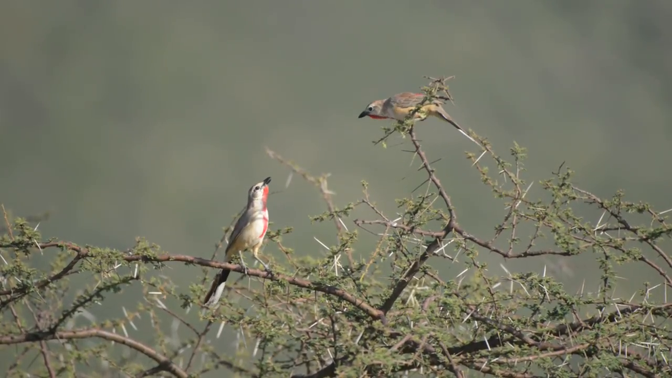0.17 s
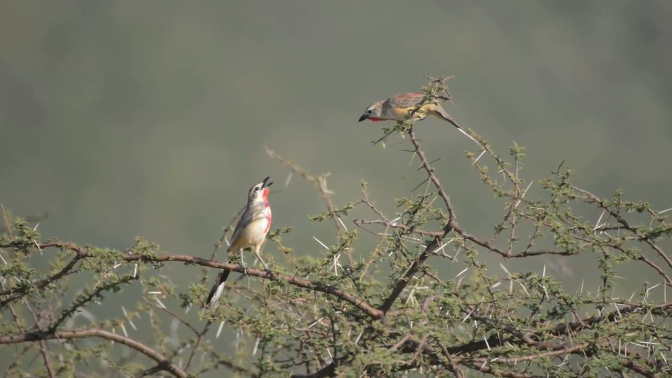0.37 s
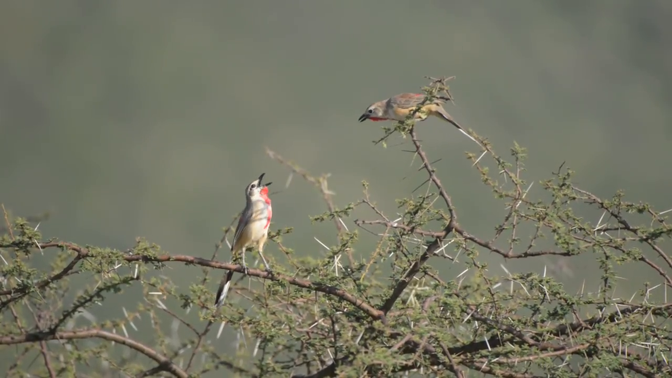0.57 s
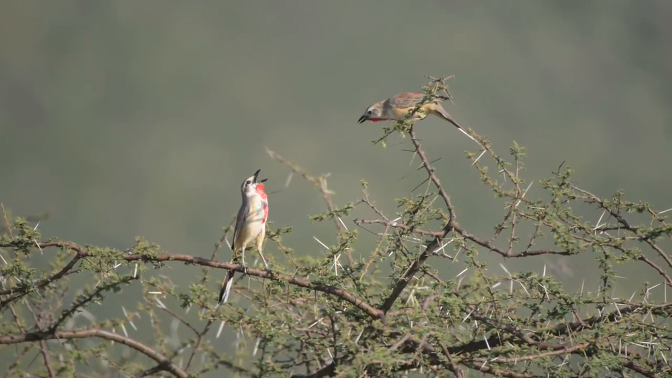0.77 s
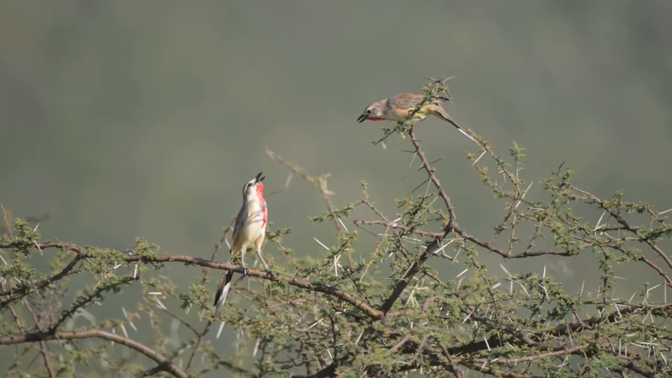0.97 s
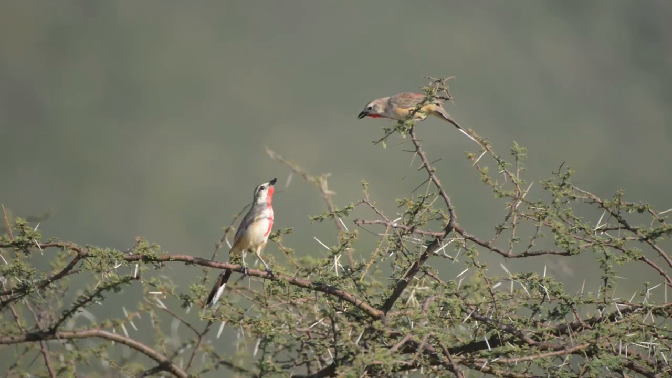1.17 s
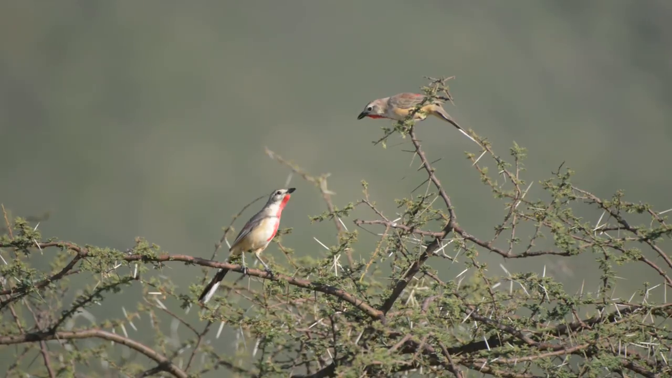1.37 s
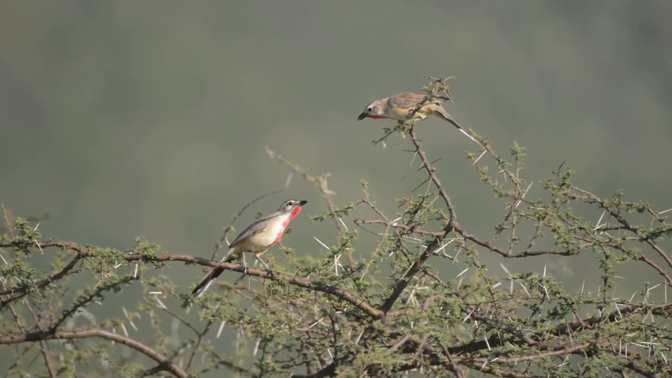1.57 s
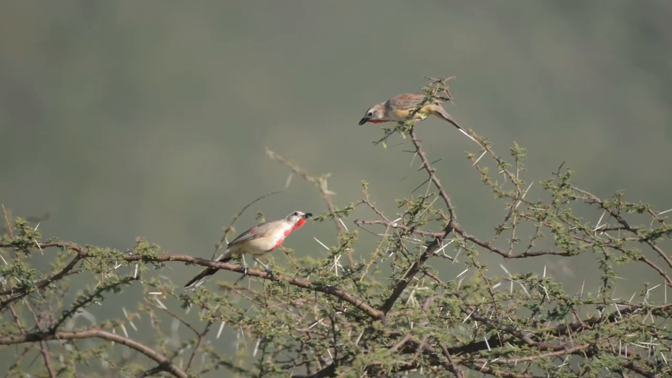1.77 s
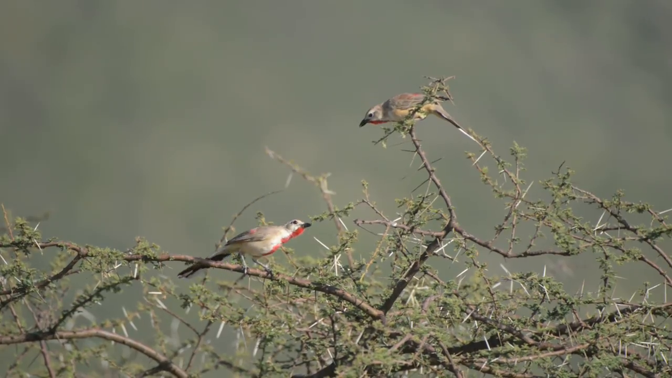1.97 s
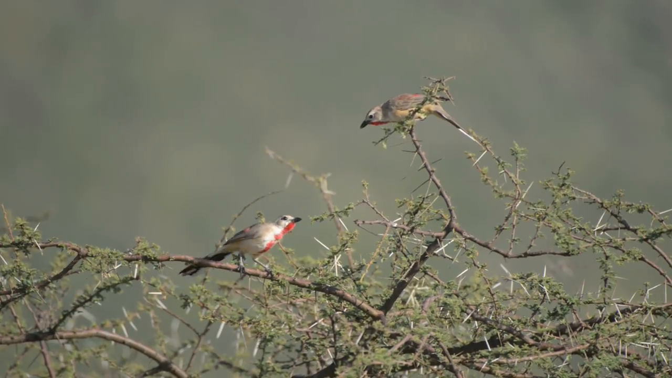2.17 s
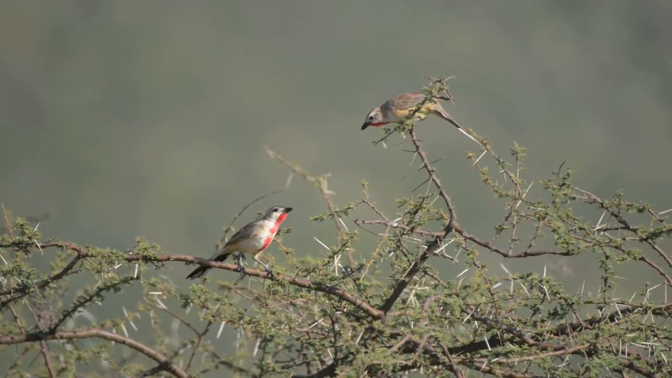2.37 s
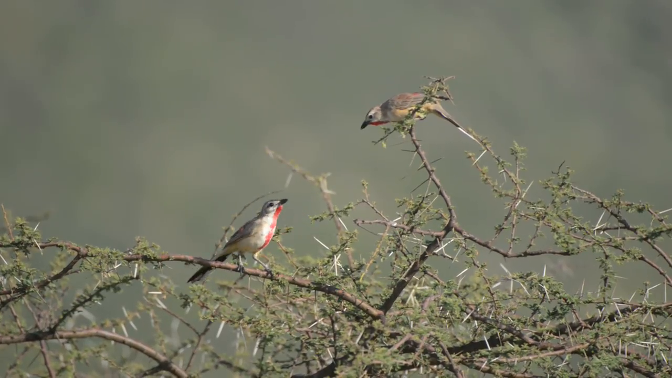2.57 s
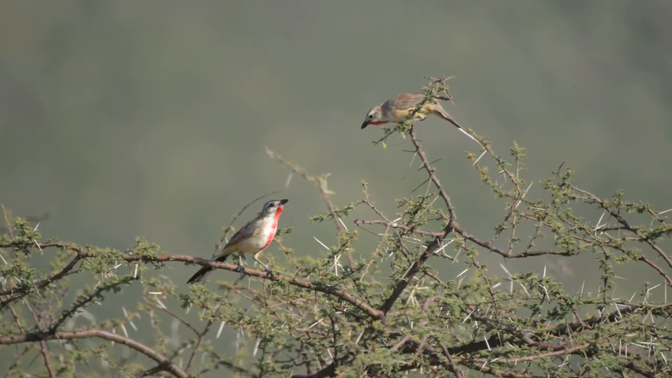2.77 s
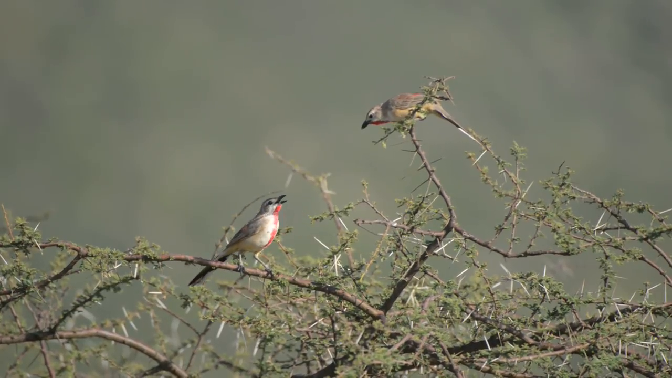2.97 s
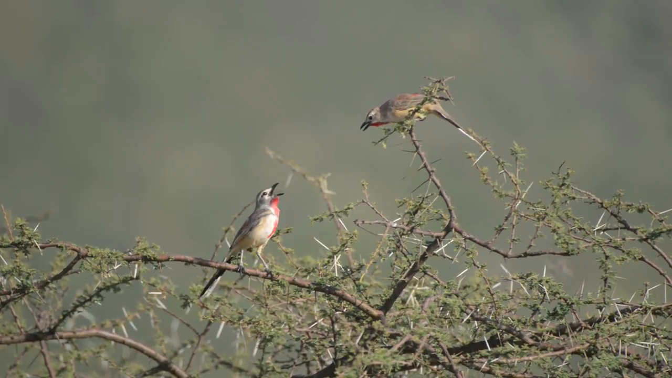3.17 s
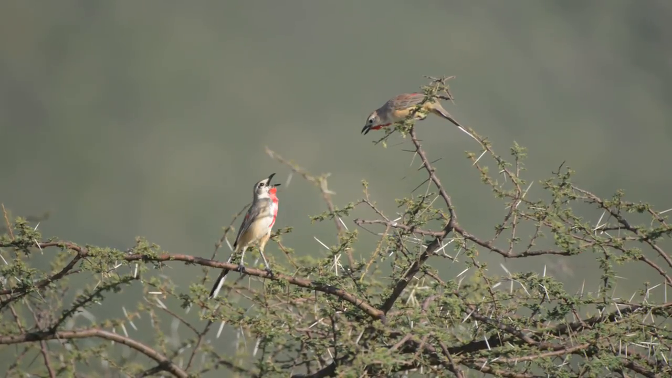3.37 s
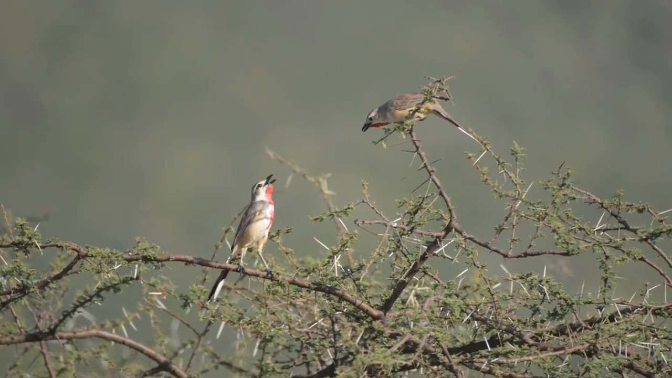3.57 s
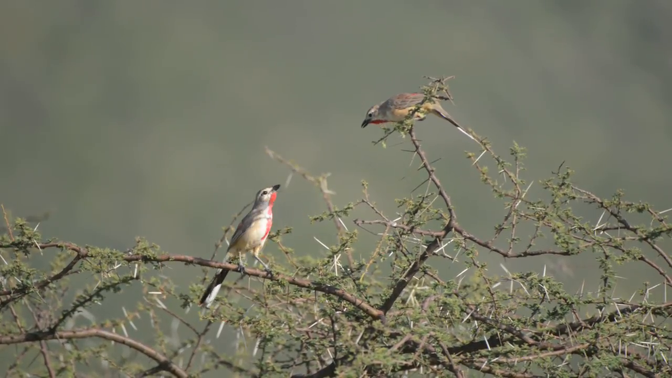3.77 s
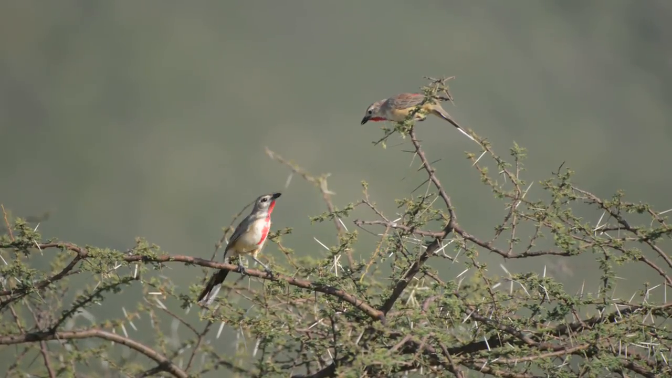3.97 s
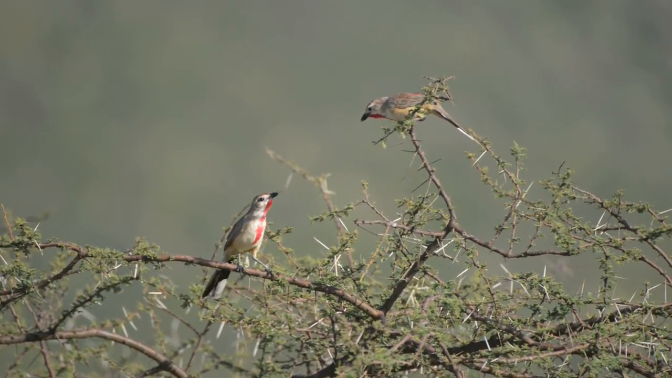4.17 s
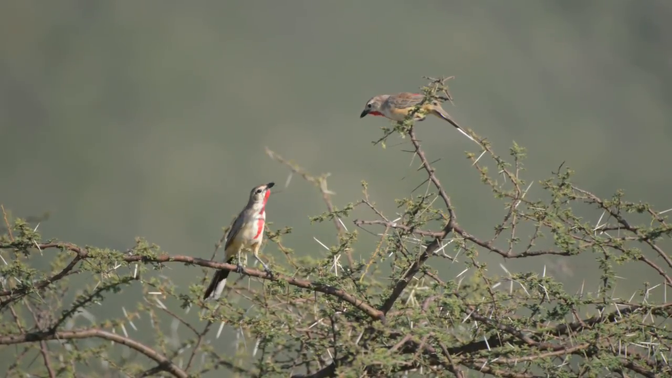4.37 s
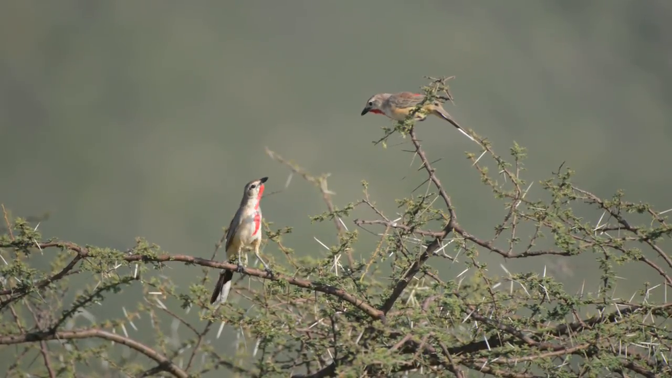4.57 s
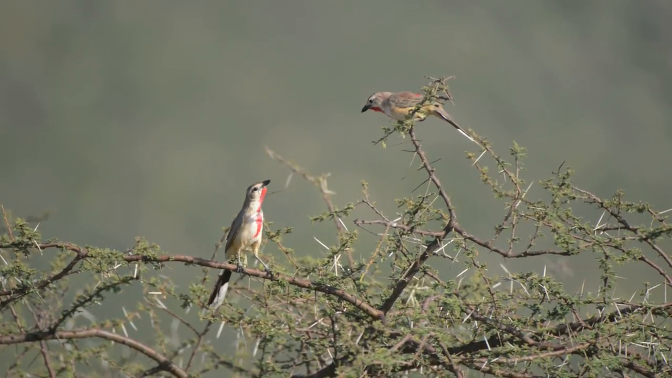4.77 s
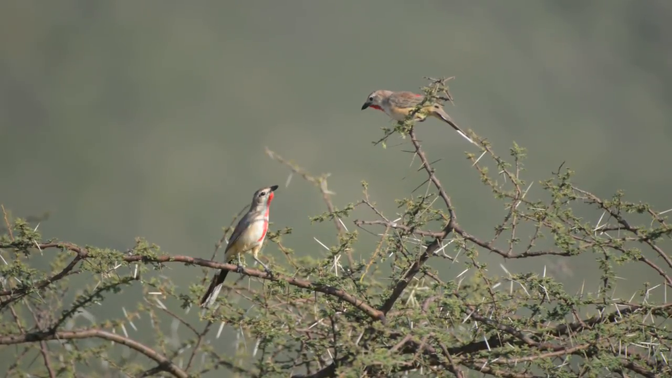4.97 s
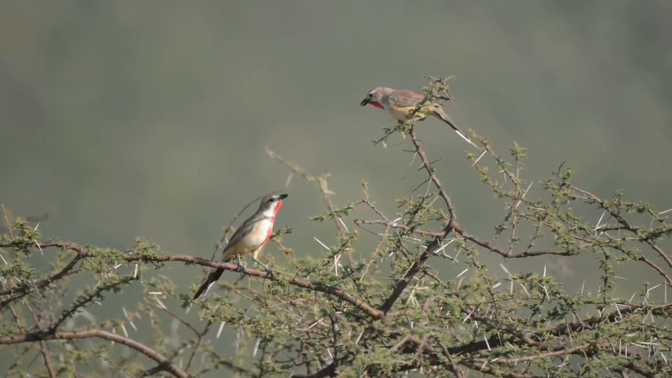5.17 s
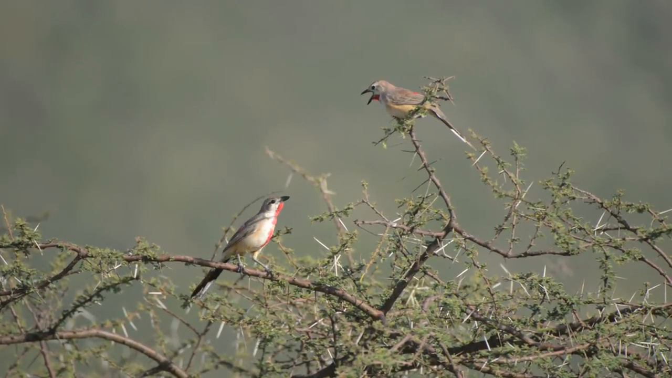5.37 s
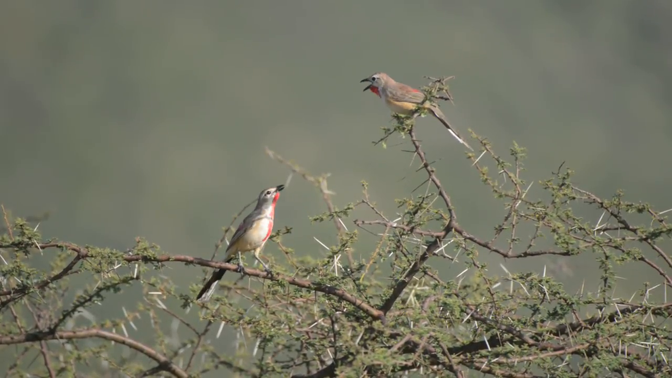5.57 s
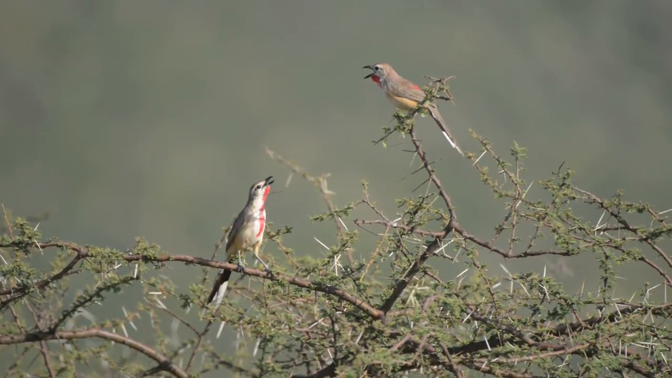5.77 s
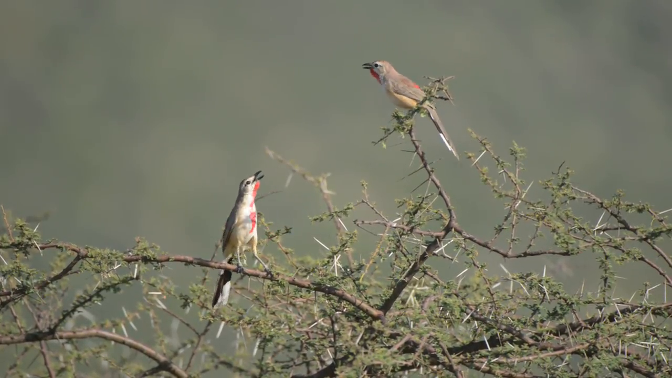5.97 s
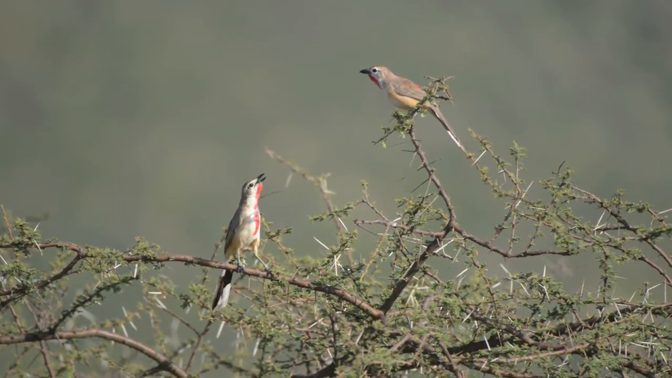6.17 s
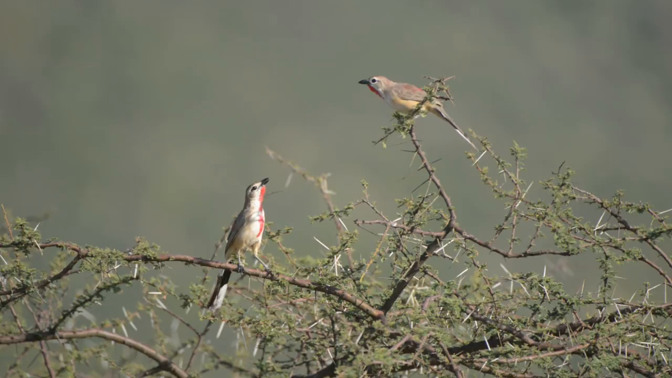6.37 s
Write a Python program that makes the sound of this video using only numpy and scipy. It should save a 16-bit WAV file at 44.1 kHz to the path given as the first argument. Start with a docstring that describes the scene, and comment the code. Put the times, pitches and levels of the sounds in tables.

```python
"""A pair of bush-shrikes whistle from a thorn bush: gliding sines with faint overtones, trills, scrub echo.
Dawn chorus behind: twitterer, assorted short sweeps and a low three-note whistler (pitch-swept sines), throaty
chatter (stacked partials with rasp), doves (falling sine coos, narrow-band murmur), sharp ticks, dry rustles.
Background: distant birds as random chirps blurred into noise haze, and the coloured hiss of air and microphone."""
import sys
import numpy as np
from scipy import signal
from scipy.fft import rfft, irfft
from scipy.io import wavfile
from scipy.ndimage import uniform_filter1d

SR = 44100
rng = np.random.default_rng(int(sys.argv[2]) if len(sys.argv) > 2 else 0)


def log_audio(samples):
    """Write samples as a 16-bit WAV file to the path given in sys.argv[1]."""
    # one column per channel
    frames = np.atleast_2d(samples).T
    # limit to full scale, then quantise
    limited = np.clip(frames, -1, 1)
    pcm = np.round(limited * 32767).astype(np.int16)
    wavfile.write(sys.argv[1], SR, pcm)


N = 283122
TIME = np.arange(N) / SR

# air and microphone hiss, relative spectrum density: f/Hz, level/dB
AIR_SPECTRUM = [(8, -5.5), (25, -5), (45, -4), (82, 1), (164, -0.5), (666, -4.5), (1080, -8), (3000, -9.5),
                (6000, -12), (8800, -19), (15500, -24)]
# distant birds: t/s, level of low voices/dB, level of high voices/dB
FAR_LEVELS = [(0, -46.5, -45.5), (.19, -47, -56), (.32, -51.5, -64), (.43, -47.5, -52.5), (.523, -66, -60),
              (.61, -46, -45), (.73, -47, -51), (.94, -48, -55.5), (1.2, -51, -51.5), (1.35, -54.5, -45),
              (1.44, -52, -54), (1.53, -47, -53.5), (1.73, -51, -54.5), (1.97, -48, -50), (2.15, -57, -55),
              (2.3, -52, -54), (2.66, -46.5, -51.5), (2.85, -50, -50), (3.04, -48.5, -56),
              (3.33, -51.5, -50), (3.49, -60.5, -53), (3.68, -44.5, -52), (3.85, -49, -48),
              (4.06, -48, -50.5), (4.5, -49, -55.5), (4.588, -54, -55), (4.68, -44, -51), (4.88, -55, -55),
              (5.01, -43.5, -51), (5.11, -62, -50.5), (5.37, -48, -48.5), (5.55, -53, -51),
              (5.76, -47.5, -48), (5.97, -49, -55), (6.2, -50, -53), (6.42, -54, -48)]
# weighting of the distant crowd before levelling: f/Hz, gain/dB
FAR_SPECTRUM = [(1100, -11), (1700, -7.5), (2300, -3), (3500, -4.5), (4500, -0.5), (6000, -5.5),
                (7300, -7.5), (8800, -16.5)]
# dove coo starts: t/s
COO_STARTS = [-.2, .76, 1.72, 2.66, 3.65, 4.63, 5.65]
# one coo: t after start/s, f/Hz, level/dB
COO_CONTOUR = [(0, 994, -56), (.03, 991, -64), (0.079, 954, -57.5), (0.129, 863, -60.5), (.17, 790, -65),
               (.2, 763.5, -82), (.9, 760, -86.5)]
# second dove: start/s, length/s, f at start/Hz, middle/Hz, end/Hz, level/dB
DOVE_HOOTS = [(3.0, 0.24, 563, 565, 570, -62.5), (3.54, 0.224, 569, 558, 569, -64)]
# low cooing after each coo: t after start/s, level/dB
COO_MURMUR = [(0, -67.5), (.13, -67.5), (.2, -62.5), (.33, -64), (.45, -59.5), (.58, -59.5), (.64, -70),
              (1.0, -66)]
# low whistler, one table per note (rise, arch, fall): t/s, level/dB
LOW_TIMES = [
    [(.775, -47), (1.605, -48), (2.53, -51), (3.38, -50), (4.222, -51), (5.117, -52), (6.032, -51)],
    [(.048, -50), (.915, -51), (1.706, -50), (2.675, -52), (3.53, -52), (4.382, -52), (5.278, -53),
     (6.178, -54)],
    [(.12, -51), (1.01, -51), (1.835, -49), (2.75, -51), (3.62, -53), (4.46, -52), (5.345, -53),
     (6.265, -54)],
]
# its note shapes: length/s, f at start/Hz, turn/Hz, end/Hz
LOW_SHAPES = [(.11, 1350, 1860, 1600), (.11, 1230, 1620, 1300), (.08, 2150, 2030, 1780)]
# faint rising pips: t/s, level/dB
PIP_TIMES = [(3.481, -52), (3.869, -54), (4.141, -53), (4.47, -53.5), (4.93, -54.5)]
# their shape: length/s, f at start/Hz, turn/Hz, end/Hz
PIP_SHAPE = (.029, 1100, 1190, 1300)
# chatter notes: t/s, peak level of strongest partial/dB, f of strongest partial/Hz
CHATTER_NOTES = [(.121, -47, 2200), (.326, -46, 1965), (.668, -46, 2020), (.8145, -42, 2370),
                 (1.007, -44, 2230), (1.169, -44.5, 2050), (1.2785, -44, 2060), (1.306, -38.5, 2057),
                 (1.344, -36, 2006), (1.36, -37.5, 2010), (1.592, -43, 2333), (1.659, -41.5, 1846),
                 (1.828, -43, 2210), (1.93, -35.5, 2055), (1.95, -39.5, 2014), (1.997, -36.5, 1973),
                 (2.511, -42, 2280), (2.596, -48, 1825), (2.646, -43, 1996), (2.752, -44, 2140),
                 (3.286, -49, 2420), (3.606, -44, 2220), (3.7705, -43, 1953), (3.7965, -41, 1940),
                 (4.05, -45, 2210), (4.349, -44.5, 2280), (4.647, -54, 2000), (4.665, -44, 1930),
                 (4.7, -38.5, 1966), (4.965, -40.5, 2330), (4.988, -43, 2377), (5.008, -40, 2357),
                 (5.025, -41, 1910), (5.681, -53, 2400), (5.713, -36.5, 1973), (5.735, -40, 2010),
                 (5.748, -43, 1870), (5.759, -41, 2370), (5.78, -43, 2410), (5.798, -40.5, 2016),
                 (6.104, -49, 1785)]
# assorted whistles and sweeps, with upper partials of chatter and one steep tick:
# start/s, length/s, f at start/Hz, middle/Hz, end/Hz, level/dB
ASSORTED_SWEEPS = [(.034, 0.027, 4250, 3960, 4270, -47), (.166, .05, 6000, 5850, 4740, -55),
                   (.146, 0.039, 5200, 5240, 5540, -49), (.365, 0.071, 2136, 2480, 3660, -50),
                   (.4, 0.03, 1320, 1896, 1350, -49.5), (.423, .054, 2720, 1970, 1230, -54.5),
                   (.425, .055, 5300, 3860, 2270, -48), (.45, 0.033, 6000, 4800, 3300, -67),
                   (.564, .017, 6350, 6360, 6860, -49), (.618, .056, 4060, 4130, 3800, -42),
                   (.998, 0.029, 6840, 6650, 6260, -48.5), (1.0, .042, 6700, 8420, 7170, -56),
                   (1.03, .05, 6390, 7100, 6590, -53), (1.205, .029, 2040, 1960, 1620, -50),
                   (1.206, 0.041, 6480, 6570, 5780, -41.5), (1.25, .047, 1280, 2050, 1250, -53),
                   (1.269, .026, 4280, 4160, 4060, -47), (1.336, 0.054, 4430, 4074, 4080, -46),
                   (1.36, 0.055, 5800, 4700, 4250, -51), (1.455, 0.027, 1340, 1780, 1410, -50.5),
                   (1.753, 0.063, 3930, 4230, 4340, -52), (2.05, 0.032, 1734, 1950, 1314, -48.5),
                   (2.001, 0.017, 7250, 7310, 7580, -43.5), (2.188, 0.027, 7700, 7800, 7900, -47.5),
                   (2.352, 0.019, 7220, 5720, 5440, -44.5), (2.07, .05, 5900, 6160, 5300, -63),
                   (2.198, 0.055, 5220, 5190, 5000, -55), (2.396, .04, 3820, 3554, 3620, -52),
                   (2.487, .025, 5720, 5180, 4840, -55), (2.625, 0.027, 6300, 5300, 6040, -39.5),
                   (2.697, 0.05, 4400, 4520, 4080, -41), (2.728, .033, 4360, 5220, 4100, -37),
                   (2.778, .041, 4220, 4180, 3800, -39.5), (2.83, .35, 4395, 4505, 4470, -53.5),
                   (3.743, 0.079, 1683, 1500, 1555, -51.5), (3.709, 0.03, 4480, 4284, 4070, -50),
                   (4.327, 0.025, 5480, 5160, 4940, -47.5), (4.172, 0.033, 5800, 7200, 5800, -50.5),
                   (4.21, 0.059, 5700, 6450, 7600, -44.5), (4.343, 0.03, 4810, 6200, 7250, -45),
                   (4.419, 0.026, 4610, 4500, 4300, -44.5), (4.428, .052, 2425, 2473, 2505, -47),
                   (4.443, .045, 5000, 4980, 3520, -45.5), (4.455, .05, 4120, 3630, 3050, -44.5),
                   (4.495, 0.043, 4130, 3980, 3770, -43), (5.179, 0.037, 5440, 5470, 4900, -53),
                   (5.287, 0.21, 5380, 3910, 3060, -52), (5.593, 0.013, 5900, 9040, 10500, -48),
                   (5.7, .027, 6240, 7500, 6560, -57), (5.707, 0.027, 3960, 4060, 4450, -42),
                   (5.739, 0.031, 3870, 3670, 3900, -40.5), (5.767, 0.037, 4810, 5000, 5160, -49),
                   (5.792, .015, 4010, 4150, 3680, -43), (5.739, .039, 6330, 6540, 5750, -51.5),
                   (6.08, 0.018, 6200, 6440, 7240, -52), (6.122, .013, 7360, 6560, 5670, -50),
                   (6.225, .021, 5800, 6360, 6840, -49), (6.154, .072, 5010, 4860, 4780, -48)]
# twitter, before the beak: t/s, level of arch/dB, level of rise/dB, f at end of rise/Hz
TWITTER_NOTES = [(.03, -69, -54, 7840), (0.224, -66, -51.5, 7650), (.428, -58, -56, 7500),
                 (1.166, -52, -70, 7460), (1.455, -57, -52, 7430), (1.752, -48, -50.5, 7300),
                 (1.961, -46, -49, 7500), (2.15, -46, -70, 7400), (2.175, -70, -50, 7400),
                 (2.322, -44.5, -43, 8300), (2.405, -57, -50, 7600), (2.43, -72, -53, 7300),
                 (2.474, -47, -36.5, 7960), (2.6, -54, -47, 7430), (2.659, -70, -55, 8200),
                 (2.823, -52, -51.5, 7550), (3.026, -56.5, -52.5, 7450), (3.21, -54, -50, 7400),
                 (3.401, -51, -46.5, 7250), (3.598, -51, -45.5, 7360), (3.809, -50, -49.5, 7400),
                 (4.006, -57, -48, 7280)]
# twitter arch: length/s, f at start/Hz, middle/Hz, end/Hz
ARCH_SHAPE = (.04, 5400, 7750, 6350)
# twitter rise, its end set per note: length/s, f at start/Hz, middle/Hz
RISE_SHAPE = (.048, 6300, 7150)
# beak response: f/Hz, gain/dB
BEAK_RESPONSE = [(4500, -6), (6400, -0.5), (7000, 2), (7400, -1), (7800, -6.5), (8300, -20)]
# tick calls: t/s, peak level/dB, f reference/Hz (swept from 0.57 to 1.55 times)
TICK_CALLS = [(0.5751, -47, 6200), (3.157, -43.5, 5900), (3.195, -35, 5760), (5.4164, -46, 6500),
              (5.451, -29, 5850), (5.5917, -43.5, 6500)]
# dry rustles: t/s, level at the peak/dB
RUSTLE_PUFFS = [(0.0149, -51), (0.0717, -52), (0.2838, -53), (0.3944, -58), (0.5387, -51), (0.725, -48),
                (0.9303, -53), (1.0854, -48.5), (1.4965, -52), (1.934, -51), (2.2159, -53), (3.7678, -54),
                (4.9382, -56), (6.1968, -50)]
# shrike whistles, one table each: t/s, f/Hz, level/dB, overtone brightness/dB
SHRIKE_WHISTLES = [
    [(.6, 3434, -52, 0), (.636, 3445, -37.5, 0), (.662, 3462, -28, -1), (.72, 3500, -26.5, 8.5),
     (.739, 3540, -40.5, 10), (.748, 3541, -31.5, 7), (.768, 3573, -21.5, -11), (.812, 3610, -30.5, -0.5),
     (.898, 3627, -24, -2), (.916, 3670, -26.5, -18), (.948, 3670, -43, -8)],
    [(3.21, 3448, -66, 4), (3.232, 3444, -41.5, -0.5), (3.268, 3481, -29, 2.5), (3.31, 3507, -19.5, 1),
     (3.34, 3538, -29, 11), (3.356, 3550, -31, 5.5), (3.372, 3550, -23, 2.5), (3.4, 3620, -23, -6),
     (3.45, 3630, -23.5, -15.5), (3.51, 3634, -21, -8.5), (3.54, 3678, -25, -10), (3.56, 3760, -55, -11.5)],
    [(5.46, 3850, -60, 0), (5.5, 3894, -33, -4), (5.525, 3920, -21, -4), (5.546, 3905, -19, -0.5),
     (5.562, 3905, -29.5, 9), (5.571, 3900, -27, 1), (5.582, 3900, -39, 3), (5.603, 3910, -46.5, -0.5)],
    [(5.73, 2760, -50, 0), (5.748, 2838, -35, -10), (5.784, 2863, -24.5, -1.5), (5.85, 2876, -20.5, 0),
     (5.912, 2890, -25, -3), (5.94, 2910, -32.5, -3), (5.958, 2890, -39, -1), (5.985, 2800, -55.5, 8)],
]
# per whistle, relative to the note: 2nd/dB, 3rd/dB, 4th/dB, 5th harmonic/dB
SHRIKE_OVERTONES = [(-25, -32.5, -44, -70), (-29.5, -31, -41, -75), (-31.5, -34, -67, -70),
                    (-32, -29, -56, -47.5)]
# trill closing each rising whistle: t/s, level/dB
TRILL_STARTS = [(.948, -26.5), (3.571, -24.5)]
# trill pips: t after start/s, length/s, f at start/Hz, middle/Hz, end/Hz, level re trill/dB
TRILL_PIPS = [(.001, 0.0099, 3890, 3696, 3750, -11.5), (.008, 0.0183, 3665, 3630, 3440, 2),
              (.024, .014, 3520, 3620, 3620, -1.5), (.036, 0.018, 3555, 3650, 3650, -13)]
# other shrike, falling pips between its whistles: start/s, length/s, f at start/Hz, middle/Hz, end/Hz, level/dB
LINK_PIPS = [(5.606, 0.03, 4035, 3870, 3816, -19.5), (5.637, 0.028, 3720, 3220, 3060, -37),
             (5.658, 0.0194, 2960, 2860, 2740, -25.5), (5.672, 0.015, 2640, 2632, 2630, -22),
             (5.681, 0.015, 2480, 2566, 2560, -25.5), (5.691, 0.027, 2545, 2545, 2500, -42)]

AIR_DB, FAR_SWELL_DB, TWIGS_DB = -53, 0.97, -11
SCRUB_T60_S, STOPBAND_HZ = .36, 16100
CHUCK_PULSE_HZ, CHUCK_S = 482, 0.022
RASP_DB, RASP_S, RASP_WAVER_DB = -17, .04, 2.5
RISE_AFTER_S = 0.032
LOW_LATE = 1.7  # exponent; puts the turn at two thirds of the note


def from_db(db):
    """Decibels to gain."""
    return 10 ** (np.asarray(db) / 20)


def rms_one(x):
    """Scale to rms 1."""
    return x / np.sqrt(np.mean(x ** 2) + 1e-20)


def drift(rate_hz):
    """Slow random signal of spread 1, with rate_hz new values a second."""
    steps = np.convolve(rng.standard_normal(int(N / SR * rate_hz) + 4), [.5, 1, .5], "same")
    return np.interp(TIME * rate_hz, np.arange(len(steps)), rms_one(steps))


def band_noise(low_hz, high_hz):
    """Band-passed white noise, rms 1."""
    sos = signal.butter(2, [low_hz, high_hz], "band", fs=SR, output="sos")
    return rms_one(signal.sosfilt(sos, rng.standard_normal(N)))


def coloured(x, spectrum):
    """Apply a gain curve (f/Hz, gain/dB), interpolated over log frequency."""
    hz, db = np.transpose(spectrum)
    grid_hz = np.maximum(np.fft.rfftfreq(N, 1 / SR), 1)
    gain = from_db(np.interp(np.log(grid_hz), np.log(hz), db))
    return irfft(rfft(x) * gain, N)


def add(out, start_s, sound):
    """Mix a sound in at a time, trimmed to the scene."""
    at = round(start_s * SR)
    sound, at = sound[max(-at, 0):], max(at, 0)
    out[at:at + len(sound)] += sound[:max(N - at, 0)]


def echoes(x, t60_s, gap_s):
    """Scattered returns: decaying noise tail of energy 1 after a short gap."""
    age_s = np.arange(int(t60_s * SR)) / SR
    tail = rng.standard_normal(len(age_s)) * from_db(-60 * age_s / t60_s) * (age_s > gap_s)
    return signal.fftconvolve(x, tail / np.sqrt(np.sum(tail ** 2)))[:N]


def chirps(rows, edge, waver_db, octave_db, third_db=-80, late=1):
    """Short whistles: parabolic pitch, turn delayed by late; air turbulence wavers each level."""
    out, waver = np.zeros(N), from_db(waver_db * drift(90))
    for (start_s, length_s, first_hz, middle_hz, last_hz, db), chance in zip(rows, rng.random(len(rows))):
        u = np.linspace(0, 1, max(int(length_s * SR), 8))
        parabola = np.polyfit([0, .5, 1], [first_hz, middle_hz, last_hz], 2)
        phase = 2 * np.pi * np.cumsum(np.polyval(parabola, u ** late)) / SR
        swell = np.sin(np.pi / 2 * np.clip(np.minimum(u, 1 - u) / edge, 0, 1))
        swell = swell * waver[int(chance * (N - len(u))):][:len(u)]  # random stretch of the waver
        tone = np.sin(phase) + from_db(octave_db) * np.sin(2 * phase) + from_db(third_db) * np.sin(3 * phase)
        add(out, start_s, np.sqrt(2) * from_db(db) * swell * tone)
    return out


def chucks(rows):
    """Low buzz through a throat: strongest partial, its neighbours, and a pair an octave up."""
    out = np.zeros(N)
    for (start_s, db, hz, length_s), chances in zip(rows, rng.standard_normal((len(rows), 6))):
        age_s = np.arange(int(max(length_s, .005) * SR)) / SR
        partials = [(hz, 0), (hz - CHUCK_PULSE_HZ, -16), (hz + CHUCK_PULSE_HZ, -11),
                    (hz + 2 * CHUCK_PULSE_HZ, -15), (2 * hz, -10), (2 * hz + CHUCK_PULSE_HZ, -14)]
        tone = 0
        for (f_hz, level_db), chance in zip(partials, chances):
            gain = from_db(level_db + 0.6 * chance * (level_db < 0))  # the strongest stays fixed
            tone = tone + gain * np.sin(2 * np.pi * f_hz * age_s + 9 * chance)
        swell = np.minimum(age_s / 0.0013, 1) * np.cos(np.pi / 2 * age_s / age_s[-1])
        add(out, start_s - .002, from_db(db) * swell * tone)
    return out


def air_hiss():
    """Air and microphone: steady coloured noise."""
    return from_db(AIR_DB) * rms_one(coloured(rng.standard_normal(N), AIR_SPECTRUM))


def far_birds(count):
    """Faint random chirps and chucks with echo and haze; low and high voices swell apart."""
    draw = rng.random((count, 6))
    start_s = draw[:, 0] * N / SR
    length_s = .01 + .045 * draw[:, 1] ** 2
    middle_hz = 1500 * (7500 / 1500) ** draw[:, 2]
    first_hz = middle_hz * (.6 + .55 * draw[:, 3])
    last_hz = middle_hz * (.5 + .6 * draw[:, 4])
    db = 4.5 * draw[:, 5] + 10 * np.log10(middle_hz / 3000)
    calls = chirps(np.c_[start_s, length_s, first_hz, middle_hz, last_hz, db],
                   edge=0.54, waver_db=3.5, octave_db=-12.0)
    # every third chirp has a chuck at its start
    chuck_rows = np.c_[start_s[::3], 7 * draw[::3, 5], 1600 + 1400 * draw[::3, 3], length_s[::3] / 2]
    calls += from_db(-14.0) * chucks(chuck_rows)
    calls = rms_one(calls + from_db(-6.5) * echoes(calls, 0.36, 0.004))
    crowd = coloured(from_db(5.5) * calls + band_noise(900, 9500), FAR_SPECTRUM)
    s, *levels_db = np.transpose(FAR_LEVELS)
    out = 0
    for kind, level_db in zip(("low", "high"), levels_db):
        half = signal.sosfilt(signal.butter(3, 3500, kind, fs=SR, output="sos"), crowd)
        half = half / np.sqrt(uniform_filter1d(half ** 2, size=3000) + 1e-12)  # a large crowd keeps even
        out = out + from_db(np.interp(TIME, s, level_db) + FAR_SWELL_DB * drift(9)) * half
    return out


def doves():
    """Repeated falling sine coo, two hoots, and a narrow-band noise blur of cooing."""
    after_s, hz, db = np.transpose(COO_CONTOUR)
    since_s = TIME - np.array(COO_STARTS)[np.searchsorted(COO_STARTS, TIME) - 1]
    phase = 2 * np.pi * np.cumsum(np.interp(since_s, after_s, hz)) / SR
    coo = np.sqrt(2) * from_db(np.interp(since_s, after_s, db) + 1.5 * drift(30.2)) * np.sin(phase)
    hoots = chirps(DOVE_HOOTS, edge=0.18, waver_db=3.5, octave_db=-40)
    later_s, murmur_db = np.transpose(COO_MURMUR)
    murmur = from_db(np.interp(since_s, later_s, murmur_db)) * band_noise(780, 900)
    return coo + hoots + murmur


def chatter():
    """Throaty notes, each in a puff of rasping noise."""
    puffs = np.zeros(N)
    for start_s, db, _ in CHATTER_NOTES:
        add(puffs, start_s - RASP_S / 2, from_db(db + RASP_DB) * np.hanning(int(RASP_S * SR)))
    rasp = puffs * band_noise(1600, 4800) * from_db(RASP_WAVER_DB * drift(150))
    return chucks([(*row, CHUCK_S) for row in CHATTER_NOTES]) + rasp


def low_whistler():
    """Three fixed note shapes (rise, arch, fall) with a clear octave, and faint rising pips."""
    rows = [(s, *shape, db) for times, shape in zip(LOW_TIMES, LOW_SHAPES) for s, db in times]
    rows += [(s, *PIP_SHAPE, db) for s, db in PIP_TIMES]
    return chirps(rows, late=LOW_LATE, edge=0.45, waver_db=1.1, octave_db=-22.0)


def assorted_sweeps():
    """Assorted near-pure sweeps: whistles, stray twitter, upper chatter partials, one tick."""
    return chirps(ASSORTED_SWEEPS, edge=0.12, waver_db=1.5, octave_db=-37.0)


def twitterer():
    """Arch and rise sweeps, filtered by the beak, which fades the top."""
    rows = [(s, *ARCH_SHAPE, db) for s, db, _, _ in TWITTER_NOTES]
    rows += [(s + RISE_AFTER_S, *RISE_SHAPE, hz, db) for s, _, db, hz in TWITTER_NOTES]
    return coloured(chirps(rows, edge=0.033, waver_db=3.5, octave_db=-60), BEAK_RESPONSE)


def rustles():
    """Short dry puffs of wide-band noise."""
    puffs = np.zeros(N)
    for start_s, db in RUSTLE_PUFFS:
        add(puffs, start_s, from_db(db) * np.hanning(int(0.014 * SR)))
    return puffs * band_noise(1800, 9500)


def ticks():
    """Tick calls: upward sweeps so steep that they sound as clicks."""
    out, u = np.zeros(N), np.linspace(0, 1, int(0.0069 * SR))
    for start_s, db, hz in TICK_CALLS:
        phase = 2 * np.pi * np.cumsum(hz * (0.57 + 0.98 * np.sqrt(u))) / SR
        add(out, start_s, from_db(db) * np.sin(np.pi * u) ** 2 * np.sin(phase))
    return out


def shrikes():
    """Long whistles as gliding sines with weak harmonics; then trills and the falling link."""
    out = np.zeros(N)
    for rows, overtones_db in zip(SHRIKE_WHISTLES, SHRIKE_OVERTONES):
        s, hz, db, bright_db = np.transpose(rows)
        t = np.arange(s[0], s[-1], 1 / SR)
        phase = 2 * np.pi * np.cumsum(np.interp(t, s, hz)) / SR
        upper = sum(from_db(level_db) * np.sin(k * phase) for k, level_db in enumerate(overtones_db, start=2))
        tone = np.sin(phase) + from_db(np.interp(t, s, bright_db)) * upper
        level = uniform_filter1d(from_db(np.interp(t, s, db)), size=200)
        add(out, s[0], level * signal.windows.tukey(len(t), .04) * tone)
    whistles = np.sqrt(2) * out * from_db(0.74 * drift(120))
    pips = [(start_s + after_s, *shape, db + pip_db)
            for start_s, db in TRILL_STARTS for after_s, *shape, pip_db in TRILL_PIPS]
    return whistles + chirps(pips + LINK_PIPS, edge=0.55, waver_db=-0.6, octave_db=-30, third_db=-34.5)


def scene():
    """Near pair, chorus, scrub echo, distant haze and hiss at one microphone."""
    near = shrikes() + ticks() + rustles()
    chorus = twitterer() + assorted_sweeps() + low_whistler() + chatter() + doves()
    chorus = chorus + from_db(TWIGS_DB) * echoes(chorus, 0.022, .002)  # twigs around each singer
    scattered = echoes(from_db(-20) * near + from_db(-15.0) * chorus, SCRUB_T60_S, 0.017)
    return (near + chorus + scattered + far_birds(count=1900) + air_hiss())[None]


def record(dry):
    """Steep low-pass, 60 dB down from STOPBAND_HZ."""
    return signal.sosfilt(signal.cheby2(24, 60, STOPBAND_HZ, fs=SR, output="sos"), dry)


dry = scene()
out = record(dry)
log_audio(out)
```